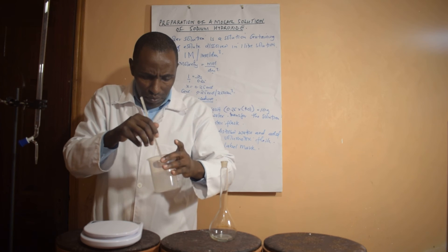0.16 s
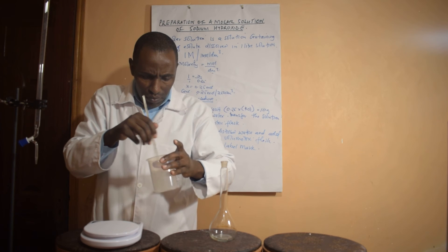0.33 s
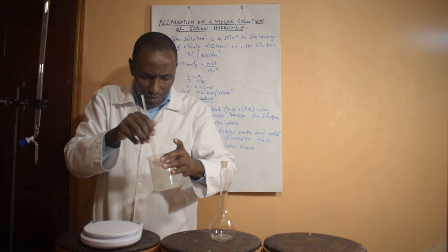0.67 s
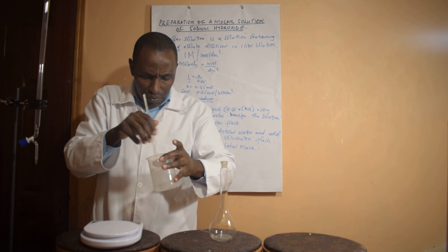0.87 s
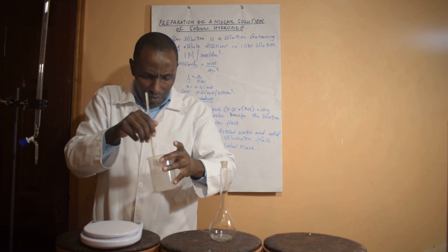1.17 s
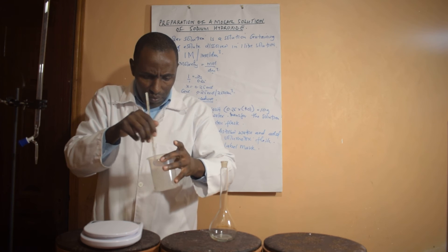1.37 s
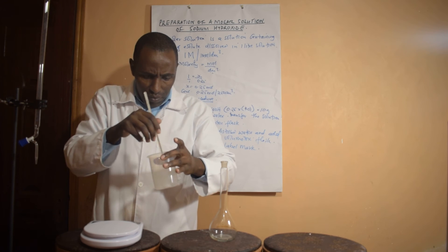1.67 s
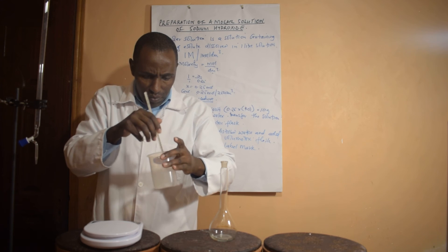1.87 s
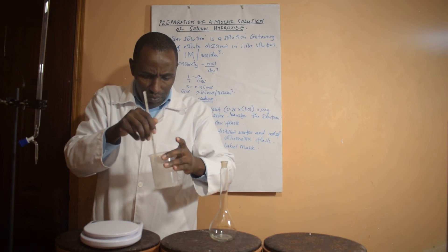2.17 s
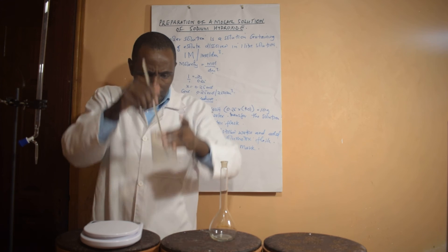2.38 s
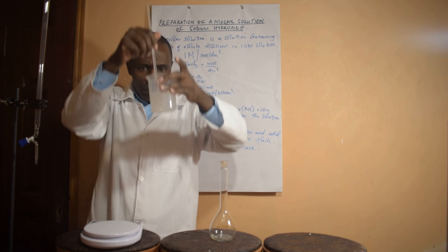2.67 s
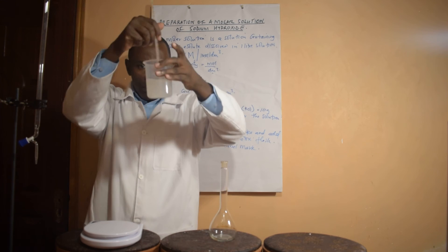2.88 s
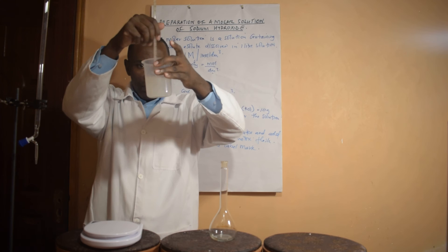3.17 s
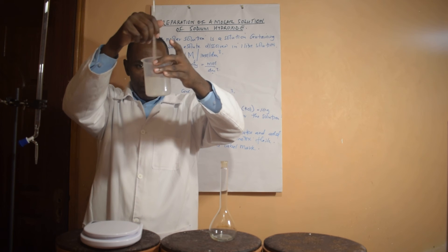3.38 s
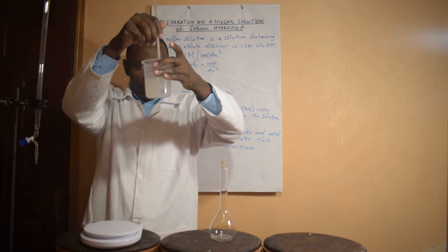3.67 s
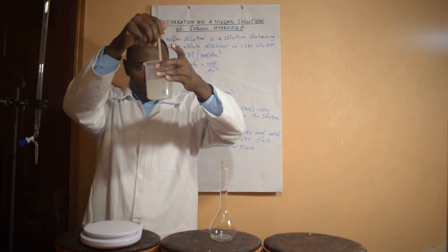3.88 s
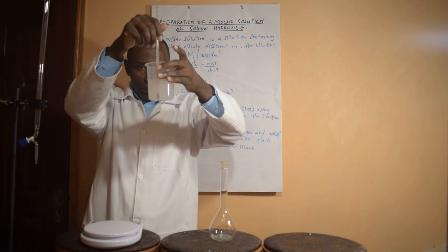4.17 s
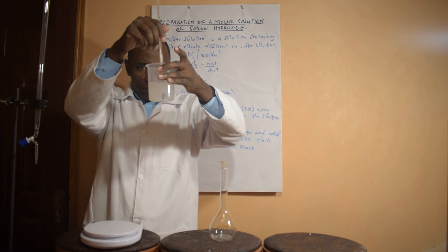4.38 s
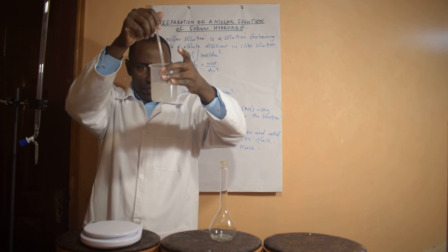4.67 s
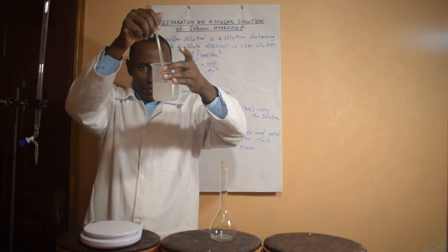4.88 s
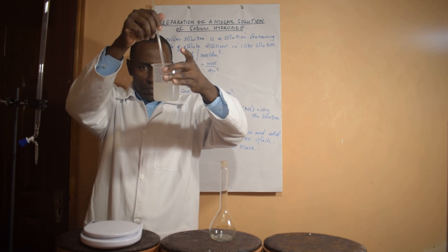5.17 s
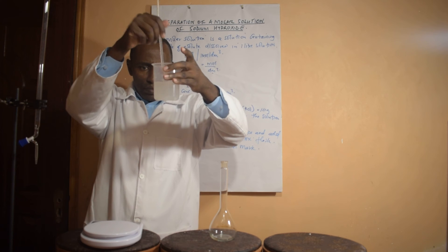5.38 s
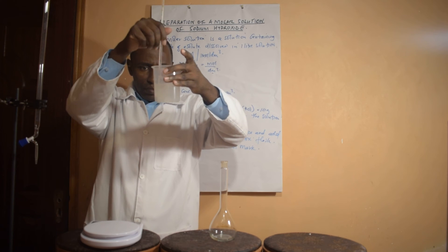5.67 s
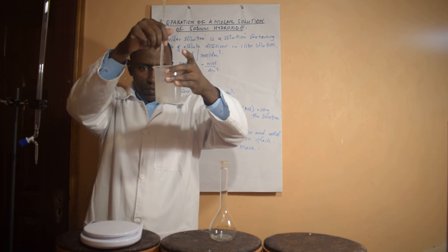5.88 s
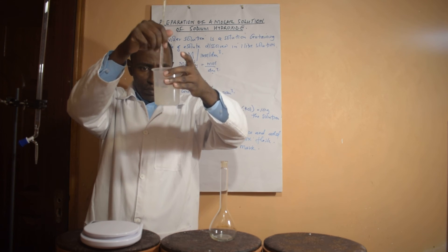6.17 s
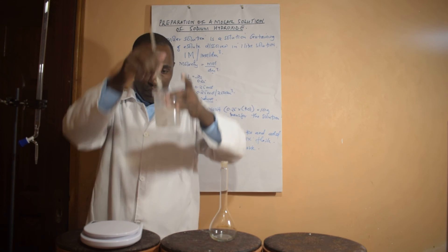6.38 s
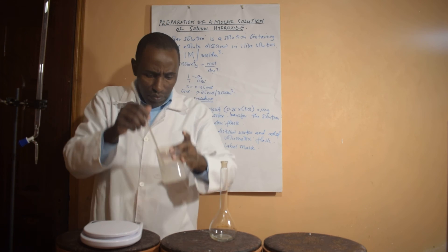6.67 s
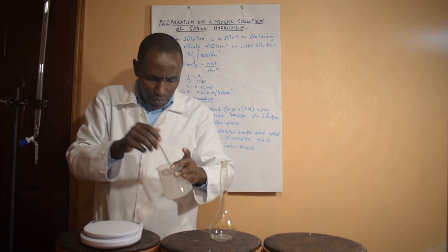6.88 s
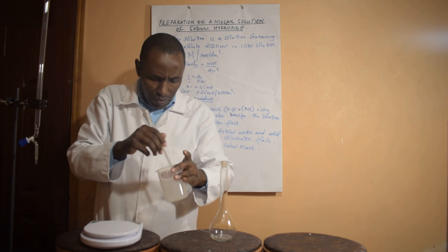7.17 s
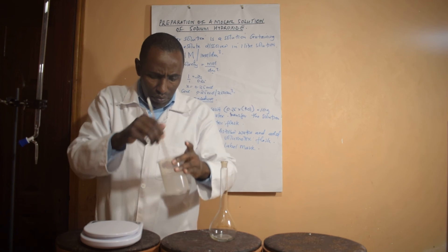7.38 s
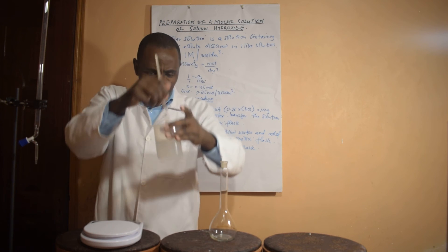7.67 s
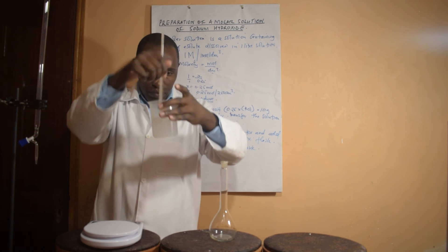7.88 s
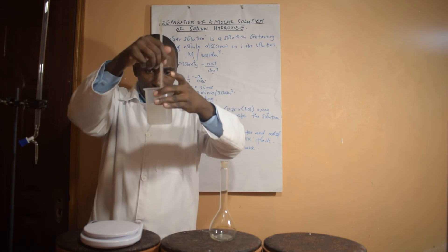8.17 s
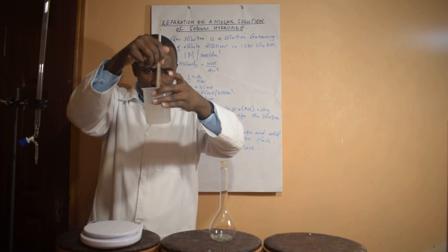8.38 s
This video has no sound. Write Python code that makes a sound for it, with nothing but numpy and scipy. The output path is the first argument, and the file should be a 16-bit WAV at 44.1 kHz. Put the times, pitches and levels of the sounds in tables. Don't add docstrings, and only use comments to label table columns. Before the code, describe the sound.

In a small quiet room, a thin rod stirs liquid in a hand-held glass beaker, heard fairly close with short early reflections. From 0 to 2.2 seconds, gritty scraping and tiny ticks run under uneven knocks, hardest around 0.4 to 1.1, then softer. From 2.2 to 3.1 it almost stops, with only faint touches. From 3.2 to 4.5 come brisk hard clinks, roughly four or five a second, each a short damped wet-glass knock with a bright crack. A lull follows until 5.4, then another cluster with strong blows near 5.8 and 6.3. After a brief gap, lighter scrapes and taps from 7 lead to a small higher gulp at 7.5 and sharp clinks from 8 to 8.5. Quiet low gulps dot the stirring. Steady hiss lies below, with a faint far engine swelling near 0.3 and revving gently around 7.

```python
import sys
import numpy as np
from scipy import signal
from scipy.fft import rfft, irfft, next_fast_len
from scipy.io import wavfile

SR = 44100
rng = np.random.default_rng(int(sys.argv[2]) if len(sys.argv) > 2 else 0)


def volts_from_decibels(level):
    exponent = np.asarray(level, float) / 20
    return 10 ** exponent


def bounce(signal):
    frames = np.transpose(np.atleast_2d(signal))
    limited = np.clip(frames, -1, 1)
    pcm = np.round(limited * 32767).astype(np.int16)
    wavfile.write(sys.argv[1], SR, pcm)


N = 376613

# t/s, knock level/dB, wall f/Hz, crack level/dB
BLOWS = [(0.4399, -19.5, 1108, -37), (0.6408, -15.5, 1170, -19), (0.8642, -28, 1080, -30),
         (.875, -14.5, 1102, -10.5), (1.091, -27, 1167, -28.5), (1.277, -26, 1090, -28),
         (1.7143, -35, 1115, -38), (2.074, -34, 993, -59), (3.263, -21, 1110, -9), (3.456, -53, 1190, -42),
         (3.4767, -21.5, 1092, -13), (3.697, -14.5, 1270, -19), (3.868, -29, 1060, -39),
         (3.917, -21, 1110, -11), (4.13, -20, 1113, -16), (4.371, -16, 1116, -27), (4.497, -29, 1100, -37),
         (4.516, -18, 1132, -9), (5.424, -37.5, 1164, -26.5), (5.791, -17.5, 1112, -30),
         (5.822, -12, 1113, -12), (6.04, -23.5, 910, -33), (6.259, -28.5, 1000, -40),
         (6.294, -16.5, 976, -24), (6.96, -35.5, 1124, -38), (7.08, -45.5, 1120, -24.5),
         (7.213, -18.5, 1135, -38.5), (7.989, -20.5, 1217, -9), (8.2353, -18, 1077, -32.5),
         (8.4621, -13.5, 1276, -9)]
# t/s, peak level/dB, loudest f/Hz
TAPS = [(0.123, -36, 5000), (0.341, -30.5, 6000), (.397, -28.5, 6900), (1.488, -31, 6240),
        (1.607, -34, 6000), (1.626, -35, 6300), (5.7085, -46, 8000), (1.6587, -32.5, 6040),
        (2.716, -39.5, 4500), (3.207, -31, 6200), (3.453, -35.5, 4770), (3.867, -31, 6100),
        (5.791, -23.5, 6240), (3.2247, -21.5, 5330), (3.5708, -24.5, 4800), (3.8837, -23.5, 8000),
        (3.8872, -41, 7040), (3.9108, -14.5, 5000), (4.486, -34, 6000), (5.03, -39, 6100),
        (5.037, -48, 6100), (5.6518, -29, 4130), (5.7745, -31.5, 5330), (6.1464, -29, 4360),
        (6.9255, -43, 4500), (7.1017, -38, 5500), (7.6102, -37.5, 6500), (7.858, -31.5, 4020),
        (7.962, -26.5, 6300), (8.2052, -29.5, 6600), (8.221, -25.5, 6100), (8.325, -31.5, 6300),
        (8.432, -29, 6540)]
# f/Hz, level/dB, time to fall 60 dB/s
SKID_MODES = [(3180, -4, 0.0041), (4250, 8.5, 0.0034), (4405, 9.5, 0.0031), (6270, 2, 0.0037),
              (7970, 4.5, 0.0024), (9770, 9, 0.0011), (5500, -6, 0.0033), (10800, -4, 0.00036),
              (13070, 8.5, 0.00051), (15500, -12, 0.0012)]


def rms_one(x):
    return x / np.sqrt(np.mean(x ** 2) + 1e-20)


def in_time(rows):
    s, *columns = np.transpose(rows)
    return [np.interp(np.arange(N) / SR, s, column) for column in columns]


def at_hz(points, hz):
    table_hz, values = np.transpose(points)
    return np.interp(np.log(np.maximum(hz, 1)), np.log(table_hz), values)


def high_pass(x, hz):
    return signal.sosfilt(signal.butter(4, hz, "high", fs=SR, output="sos"), x)


def add(out, s, sound):
    i = max(int(s * SR), 0)
    out[i:i + len(sound)] += sound[:N - i]


def ring(clicks, hz, t60):
    r = volts_from_decibels(-60 / (t60 * SR))
    w = 2 * np.pi * hz / SR
    return signal.lfilter([0, np.sin(w)], [1, -2 * r * np.cos(w), r * r], clicks + 1e-18)


def damped(hz, db, t60):
    t = np.arange(int(SR * max(t60)))[:, None] / SR
    sines = np.sin(2 * np.pi * hz * t) * volts_from_decibels(db - 60 * t / t60)
    return sines @ (-1.) ** np.arange(len(hz))


def strike(s, db, modes, spread_db, detune, skid_ms, loudest_hz=None, focus_db=0):
    out = np.zeros(N)
    hz, level_db, t60 = np.transpose(modes)
    luck = rng.standard_normal((len(s), 2, len(modes)))
    grit = rng.standard_normal((len(s), SR // 20))
    ms = np.arange(SR // 20) / SR * 1000
    for k, start in enumerate(s):
        away = 0 if loudest_hz is None else np.tanh(np.abs(np.log2(hz / loudest_hz[k])) / 0.74)
        strength_db = db[k] + level_db + spread_db * luck[k, 0] - focus_db * away
        burst = grit[k] ** 3 * np.exp(-ms / skid_ms[k]) * (1 - np.exp(-ms / (0.1 * skid_ms[k])))
        burst /= np.sqrt(np.sum(burst ** 2))
        burst[0] += 4.5 / skid_ms[k]
        body = damped(hz * (1 + detune * luck[k, 1]), strength_db, t60)
        add(out, start, signal.fftconvolve(body, burst))
    return out


def stereo_noise(size, alike):
    mid, side = rfft(rng.standard_normal((2, size)))
    c = np.clip(at_hz(alike, np.fft.rfftfreq(size, 1 / SR)), -1, 1)
    return np.sqrt((1 + c) / 2) * mid + np.sqrt((1 - c) / 2) * side * [[1], [-1]]


def hiss():
    # f/Hz, level/dB per Hz
    floor_colour = [(28, -29), (55, -2.5), (122, -3.5), (550, -7.5), (1000, -13.5), (2400, -13.5),
                    (4500, -13.5), (16000, -19)]
    # f/Hz, likeness [0..1]
    floor_alike = [(60, 0.38), (180, 0.32), (550, 0.54), (1650, 0.47), (4970, 0.46), (15000, 0.43)]
    size = next_fast_len(N)
    colour = volts_from_decibels(at_hz(floor_colour, np.fft.rfftfreq(size, 1 / SR)))
    noise = irfft(stereo_noise(size, floor_alike) * colour, size)[:, :N]
    return volts_from_decibels(-56.5) * rms_one(noise)


def rumble():
    # t/s, rise/dB, width/s
    swells = [
        (.28, 11, 0.1),
        (4.3, 2, .3),
    ]
    white = rng.standard_normal(N + SR)
    t = np.arange(N) / SR
    line = rms_one(ring(white, 59.7, 2.2)) + 2.7 * rms_one(ring(white, 78.0, 0.67))
    swell_db = sum(db * np.exp(-((t - s) / width) ** 2) for s, db, width in swells)
    late = t - 7.0
    start_hz, hz_per_s, width_s = 60.7, 3.3, 0.24
    rev = np.sin(2 * np.pi * late * (start_hz + hz_per_s * late / 2)) * np.exp(-(late / width_s) ** 2)
    return volts_from_decibels(-72 + swell_db) * rms_one(line[SR:]) + volts_from_decibels(-56) * rev


def room_response():
    # delay t/s, level/dB
    echoes = [(.0034, 3), (.0052, -12), (.0075, -6), (0.0118, -7.5), (0.0189, -2.5)]
    # f/Hz, time to fall 60 dB/s
    room_t60 = [(300, 0.22), (1100, 0.21), (3000, 0.18), (6000, 0.21), (11000, 0.13)]
    # f/Hz, likeness [0..1]
    tail_alike = [(300, .75), (1200, .87), (3100, .78), (6800, .55), (12000, .35)]
    # f/Hz, phase/radians
    left_lead = [(100, 0), (1200, .2), (3700, .5), (5800, 1.1), (8000, 1.9), (11000, 2.5), (13400, 3.3),
                 (15500, 5.5)]
    size = 2 ** 15
    t, hz = np.arange(size) / SR, np.fft.rfftfreq(size, 1 / SR)
    noise, tail = stereo_noise(size, tail_alike), 0
    for centre in 150 * 2.0 ** np.arange(8):
        octaves = np.clip(np.log2(np.maximum(hz, 1) / centre), -1, 1)
        share = np.cos(np.pi / 2 * octaves) ** 2
        tail = tail + irfft(noise * share) * volts_from_decibels(-60 * t / at_hz(room_t60, centre))
    tail_db, rise_s = -21.5, 0.002
    tail = tail * volts_from_decibels(tail_db) * (1 - np.exp(-(t / rise_s) ** 2))
    bounces = sum(volts_from_decibels(db) * np.exp(-2j * np.pi * hz * lag * rng.normal(1, 0.0411)) for lag, db in echoes)
    early = 1 + bounces / np.sqrt(1 + (hz / 6000) ** 2)
    lead = np.exp(.5j * at_hz(left_lead, hz) * [[1], [-1]] - 2j * np.pi * hz * 4 / SR)
    near_db = 2 + np.array([[.3], [-.3]])
    return irfft((early + rfft(tail)) * lead) * volts_from_decibels(near_db)


def room(x):
    places, sway_s = 5, .06
    step = np.arange(N) / (sway_s * SR)
    out = np.zeros((2, N))
    for k in range(places):
        here = np.clip(1 - np.abs((step - k + places / 2) % places - places / 2), 0, 1)
        part = (x * np.sqrt(here))[None]
        out += signal.oaconvolve(part, room_response()[:, :SR // 4], axes=1)[:, :N]
    return out


def gulps():
    # t/s, peak level/dB, f/Hz
    pockets = [(1.112, -47, 115), (3.328, -47.5, 266), (3.639, -42.5, 280), (3.766, -42.5, 276),
               (4.399, -41.5, 286), (5.513, -39, 383), (5.562, -44, 493), (5.894, -43, 276),
               (6.85, -43, 400), (6.168, -39.5, 283), (7.5, -29, 686), (7.868, -41, 265),
               (8.069, -39.5, 298)]
    out, t = np.zeros(N), np.arange(SR // 8) / SR
    for s, db, hz in pockets:
        tone = np.sin(2 * np.pi * hz * (t + 0.33 * t ** 2))
        fade = volts_from_decibels(db - 5 - 60 * t * hz / 5.9)
        add(out, s, tone * fade * (1 - np.exp(-t / 0.0018)))
    return out


def drag():
    # t/s, tip on the bottom level/dB, shaft on the wall level/dB
    pressure = [(0, -55, -53.5), (.43, -53.5, -55.5), (1.16, -53, -56.5), (2.14, -51, -58), (2.4, -60, -72),
                (3.14, -66.5, -64), (3.66, -53.5, -58.5), (4.42, -57.5, -63.5), (4.62, -71, -84),
                (5.4, -90, -69), (5.61, -71, -56.5), (6.18, -55.5, -60.5), (6.49, -54.5, -70),
                (6.97, -83, -67), (7.16, -59, -54.5), (7.37, -59, -56.5), (8.06, -54.5, -61),
                (8.54, -51, -75)]
    press_db, rub_db = in_time(pressure)
    sizes = volts_from_decibels(2.9 * np.minimum(rng.exponential(1, (2, N)), 4)) * rng.choice([-1, 1], (2, N))
    slips_per_s = np.array([[1800], [250]])
    tip, shaft = sizes * (rng.random((2, N)) < slips_per_s / SR)
    scrape = 0
    for k, (hz, db, t60) in enumerate(SKID_MODES):
        scrape = scrape + volts_from_decibels(db) * ring(tip, hz, 0.4 * t60) * (-1) ** k
    murmur = ring(shaft, 1045.5, 0.13) + ring(shaft, 1093, 0.13) + volts_from_decibels(14.5) * ring(shaft, 1246, 0.016)
    strokes_per_s, stroke_db = 30.0, 5
    strokes = rng.standard_normal(int(N / SR * 60) + 2)
    wander = np.interp(np.arange(N) / SR * strokes_per_s, np.arange(len(strokes)), strokes)
    press_db = press_db + stroke_db * wander
    return volts_from_decibels(press_db - 12.0) * rms_one(scrape) + volts_from_decibels(rub_db - 10) * rms_one(murmur)


def nicks():
    # t/s, peak level/dB
    tiny_ticks = [(0.0293, -26), (0.0812, -36), (0.1074, -34), (0.18, -35), (0.2094, -41), (0.3214, -33),
                    (0.3438, -21), (0.398, -25.5), (0.4414, -39), (0.531, -32), (0.61, -34), (0.6416, -34),
                    (0.7796, -42), (0.8126, -37), (0.8305, -36), (0.8527, -23.5), (0.8777, -19.5),
                    (0.9687, -40), (1.0952, -26), (1.1895, -38), (1.278, -27.5), (1.3643, -46),
                    (1.4326, -26), (1.488, -31), (1.5248, -32), (1.5825, -31.5), (1.604, -31.5),
                    (1.6238, -37), (1.6592, -30.5), (1.7135, -44), (1.7534, -40), (1.7729, -30.5),
                    (1.814, -26), (1.912, -41), (1.9649, -44), (1.984, -40), (2.0767, -34), (2.0951, -35.5),
                    (2.1979, -32), (2.2194, -28),
                    (7.0766, -39), (7.1006, -36), (7.1124, -28.5), (7.193, -32), (7.213, -33), (7.2788, -41),
                  (7.3053, -48), (7.3435, -46), (7.3744, -27), (7.4315, -36), (7.4858, -45), (7.5143, -45),
                  (7.5895, -41), (7.6106, -40), (7.649, -47), (7.6874, -42), (7.7078, -30)]
    s, db = np.transpose(tiny_ticks)
    return high_pass(strike(s, db - 29, SKID_MODES, 5.1, 0.022, skid_ms=np.full(len(s), 1)), 1670)


def ticks():
    # t/s, peak level/dB, loudest f/Hz
    blow_ticks = [(0.44, -31.5, 5500), (0.6423, -21.5, 4500), (0.8624, -46, 4490), (0.877, -20, 4430),
                  (1.091, -26, 4440), (1.279, -35, 4580), (1.7134, -39.5, 4570), (2.0761, -37.5, 5960),
                  (3.2654, -23, 5100), (3.478, -16, 4700), (3.697, -13.5, 4500), (3.916, -26, 4490),
                  (4.129, -18.5, 4900), (4.3734, -18.5, 5000), (4.4978, -29.5, 5110), (4.5175, -15.5, 3460),
                  (5.4268, -24.5, 5000), (5.8225, -15, 4560), (6.0435, -29.5, 4370), (6.2605, -37, 4450),
                  (6.2964, -22, 3830), (6.9596, -28, 4500), (7.0778, -59, 5950), (7.213, -30.5, 4580),
                  (7.9897, -17, 3700), (8.233, -44, 6040), (8.4634, -23, 4320)]
    # f/Hz, level/dB, time to fall 60 dB/s
    tick_modes = [(3340, 1.5, 0.0033), (3824, 6, 0.0026), (4270, 2, 0.0042), (4440, -1, 0.0084),
                  (4980, -3.5, 0.0064), (5330, 1, 0.0063), (5690, 1.5, 0.0025), (5940, 0.5, 0.0075),
                  (6300, -2, 0.0073), (6420, -1, 0.006), (6900, 0.5, 0.0024), (8230, -1.5, 0.0072),
                  (8940, 8, 0.00081), (11800, -16, 0.00039)]
    # t/s, peak level/dB
    bottom_skids = [(.0295, -38), (.0796, -35), (.1089, -31.5), (.18, -43), (.321, -37.5), (.3435, -41),
                    (.608, -33.5), (.7796, -57), (.8126, -43), (.83, -32.5), (.9687, -39.5), (1.3643, -45),
                    (1.434, -38), (1.5842, -32), (1.6227, -36), (1.78, -34), (1.8148, -30), (1.9649, -59),
                    (1.984, -30), (2.0951, -46), (2.198, -33), (2.245, -37.5), (2.4733, -44), (3.1566, -42),
                    (3.608, -37), (3.6466, -27.5), (3.889, -45), (4.0048, -33), (4.008, -27), (4.351, -46),
                    (5.9274, -38), (6.1245, -45), (7.112, -36), (7.2785, -55), (7.3726, -31.5),
                    (7.395, -39), (7.41, -43)]
    # t/s, peak level/dB
    corner_skids = [(.5313, -31), (1.1903, -30.5), (1.752, -42), (1.773, -37), (2.2194, -33.5),
                    (2.9956, -47.5), (3.1042, -35.5), (3.3051, -38), (3.9, -20), (3.914, -38), (4.312, -43),
                    (4.684, -45.5), (5.3413, -42.5), (5.563, -42.5), (7.14, -47), (7.165, -39.5),
                    (7.346, -37.5), (7.425, -39.5), (7.46, -50), (7.49, -42), (7.54, -49), (7.6106, -40),
                    (7.649, -36.5), (7.6854, -30), (7.709, -31.5), (7.735, -33)]
    # t/s, peak level/dB
    rim_skids = [(.76, -41), (1.362, -48), (1.87, -41), (2.3, -41), (3.221, -25), (3.612, -46.5),
                 (3.8363, -34), (3.903, -33), (3.9993, -30.5), (4.231, -28.5), (4.25, -40), (4.315, -57),
                 (4.35, -40), (4.478, -32), (6.143, -32.5), (6.165, -30.5), (6.185, -45), (6.262, -34),
                 (5.7078, -38.5), (7.125, -36), (7.19, -38.5), (7.435, -48), (7.52, -48), (7.882, -34),
                 (8.235, -33.5), (8.35, -40)]
    taps = [*blow_ticks, *TAPS]
    skids = []
    for rows, loudest_hz in [(bottom_skids, 6100), (corner_skids, 4830), (rim_skids, 8000)]:
        skids += [(s, db, loudest_hz) for s, db in rows]
    out = 0
    # contact in ms, then level in dB
    for rows, modes, ms, gain_db in [(taps, tick_modes, 1.48, -12.5), (skids, SKID_MODES, 9.3, -1.5)]:
        s, db, hz = np.transpose(rows)
        out = out + strike(s, db + gain_db, modes, 0.22, 0.014, np.full(len(s), ms), hz, focus_db=6.5)
    return high_pass(out, 1500)


def clacks():
    # t/s, peak level/dB, loudest f/Hz
    hard = [(0.442, -35.5, 3070), (0.6404, -20, 2480), (0.8758, -17.5, 2580), (1.0918, -24, 2320),
            (1.279, -38.5, 2850), (1.714, -39, 2880), (3.224, -29, 3300), (3.265, -18.5, 2550),
            (3.477, -15.5, 2520), (3.697, -11.5, 2600), (3.8685, -29, 3600), (3.917, -17, 2490),
            (4.1278, -13.5, 2360), (4.372, -16.5, 2390), (4.5169, -14.5, 2470), (5.4269, -23, 2640),
            (5.6516, -54, 2960), (5.7908, -30, 2470), (5.8211, -10, 3220), (6.0447, -33, 3240),
            (6.26, -30, 1990), (6.296, -21.5, 2440), (6.9596, -29, 3200), (7.2155, -33.5, 3290),
            (7.7258, -34.5, 2390), (7.8696, -32.5, 2030), (7.9919, -13, 3600), (8.2372, -31.5, 2360),
            (8.4636, -17.5, 3250)]
    # f/Hz, level/dB, time to fall 60 dB/s
    clack_modes = [(1930, -8, 0.013), (2207, -8, 0.0065), (2414, 2.5, 0.0093), (2570, 1, 0.0082),
                   (2880, -6, 0.0056), (3233, -1.5, 0.0099), (3373, -3, 0.011), (3554, -9.5, 0.017),
                   (3893, -3, 0.0067)]
    light = [(s, db - 14.5, 3300) for s, db, _ in TAPS]
    s, db, hz = np.transpose([*hard, *light])
    out = strike(s, db - 26.0, clack_modes, 1.5, 0.021, np.full(len(s), .45), hz, focus_db=6.5)
    return high_pass(out, 1360)


def cracks():
    out, ms = np.zeros(N), np.arange(SR // 30) / SR * 1000
    hits = [(s, db) for s, _, _, db in BLOWS] + [(s, db + 1.5) for s, db, _ in TAPS]
    for (s, db), grit in zip(hits, rng.standard_normal((len(hits), len(ms)))):
        snap = 16 * (ms == 0)
        add(out, s, volts_from_decibels(db - 26.5) * (grit * np.exp(-ms / 8.3) + snap))
    return signal.sosfilt(signal.butter(3, 8000, fs=SR, output="sos"), high_pass(out, 1740))


def rings():
    # t/s, peak level/dB, f/Hz, time to fall 60 dB/s
    favoured = [(.045, -30, 1090, .06), (.455, -26.5, 1100, 0.033), (.655, -32, 1130, 0.033),
                (.668, -34, 1080, 0.036), (0.891, -25, 1150, 0.033), (.905, -31, 1290, 0.037),
                (.967, -31, 1150, 0.054), (.98, -40, 1080, .08), (1.32, -43, 500, .02),
                (3.218, -31, 1370, .05), (3.266, -31, 860, 0.062), (3.306, -25, 1380, 0.12),
                (3.478, -32, 600, 0.023), (4.375, -29, 1240, 0.064), (4.385, -29, 1080, 0.044),
                (5.69, -46, 1330, .04), (5.846, -30, 1080, 0.037), (5.428, -32, 1380, .07),
                (6.045, -33, 1510, .05), (6.153, -37, 1490, .05), (7.215, -28.5, 1160, .06),
                (7.6, -44, 1210, .07), (7.738, -38, 1190, .07), (7.724, -31, 1500, 0.032),
                (7.872, -33, 1950, .03), (7.985, -37, 814, 0.056), (8.112, -30, 1550, 0.033),
                (8.466, -26, 1370, 0.052), (8.482, -28, 1300, .04)]
    out = np.zeros(N)
    for s, db, hz, t60 in favoured:
        add(out, s, damped(np.array([hz]), db - 10.5, np.array([t60])))
    return np.convolve(out, np.hanning(40) / 20)[:N]


def knocks():
    # t/s, peak level/dB, wall f/Hz
    grazes = [(.001, -35, 1130), (3.237, -39, 1310), (3.249, -31, 1105), (3.466, -30, 1164),
              (3.677, -21, 1024), (3.897, -21.5, 1090), (4.116, -36, 1300), (4.362, -34, 1150),
              (5.759, -39, 1010), (7.968, -38, 1250), (7.981, -20.5, 1105), (8.211, -27, 1130),
              (8.323, -43, 1010)]
    # t/s, peak level/dB, wall f/Hz
    nudges = [(0.033, -24, 1075), (0.228, -33, 1074), (0.338, -38, 1068), (0.393, -41, 1070),
              (0.725, -28.5, 1110), (0.955, -29.5, 1074), (1.107, -27, 1168), (1.123, -48, 1260),
              (1.319, -30.5, 1023), (1.46, -32.5, 1060), (1.528, -31.5, 994), (1.658, -31, 1002),
              (1.74, -45, 1460), (1.871, -36, 1067), (1.916, -39.5, 1170), (2.133, -32, 1086),
              (2.886, -43, 1230), (2.971, -42.5, 1216), (3.121, -41.5, 1160), (3.306, -26.5, 1220),
              (3.793, -35, 1115), (4.011, -23, 1070), (4.233, -30, 1065), (4.249, -25.5, 1005),
              (5.447, -31, 1154), (5.46, -42, 1240), (5.843, -19.5, 1115), (6.15, -31, 893),
              (7.017, -34, 1027), (7.244, -29.5, 1254), (7.329, -34, 1130), (7.591, -32, 1154),
              (7.648, -40, 1150), (7.722, -24.5, 1138), (7.869, -24.5, 1175), (8.111, -28, 1106),
              (8.247, -25, 904), (8.34, -25.5, 1115), (8.361, -47, 1270)]
    # t/s, upper mode f/Hz, upper mode level/dB, base thud level/dB
    grip = [(0, 1655, -21, -13), (.45, 1403, -10.5, -7), (.75, 1520, -10.5, -23), (1.1, 1393, -8.5, -40),
            (1.3, 1387, -10.5, -5), (2.2, 1404, -10, -3), (3.0, 1400, -6.5, -22), (3.5, 1370, -9.5, -24.5),
            (4.0, 1460, -12, -6), (4.5, 1396, -11, -21), (5.45, 1334, 2, -38), (5.83, 1386, -12, -23),
            (6.04, 1460, -10, -4), (6.3, 1465, -8.5, -7.5), (7.1, 1373, -9.5, -19), (7.98, 1304, -5, -47),
            (8.2, 1593, -22.5, -6), (8.46, 1343, -8, -41)]
    # f/Hz, level/dB, time to fall 60 dB/s
    base_modes = [(529, 4, 0.013), (600, -3, 0.024), (790, 6.5, 0.0052)]
    out = np.zeros(N)
    soft = np.hanning(24) / 12
    s, db, wall_hz = np.transpose([row[:3] for row in BLOWS] + [*grazes, *nudges])
    upper_hz, upper_db, base_db = (curve[(s * SR).astype(int)] for curve in in_time(grip))
    for k in range(len(s)):
        nudge = k >= len(s) - len(nudges)
        side_db = nudge * np.array([-7, -7, -1.5, -7, -4])
        hz = np.array([*(np.array([0.814, 0.841, 1, 1.173]) * wall_hz[k]), upper_hz[k]])
        level_db = db[k] + side_db + np.array([-22, -13, -5, -9, upper_db[k] - 0.5])
        t60 = np.array([0.015, 0.022, 0.027 * 1.33 ** nudge, 0.017, 0.045])
        add(out, s[k], damped(hz, level_db, t60))
    base = strike(s, db + base_db - 29.5, base_modes, 0.54, detune=0.0065, skid_ms=np.full(len(s), .6))
    return high_pass(np.convolve(out, soft)[:N], 792) + high_pass(base, 507)


def scene():
    hits = knocks() + clacks() + ticks() + cracks()
    beaker = hits + high_pass(drag(), 960) + gulps() + rings() + nicks()
    return room(beaker) + hiss() + rumble()


def band_limit(x):
    return signal.sosfilt(signal.butter(12, 16650, fs=SR, output="sos"), x)


def record(dry):
    cut = signal.sosfilt(signal.cheby2(14, 40, 16050, fs=SR, output="sos"), dry)
    return band_limit(cut)


dry = scene()
out = record(dry)
bounce(out)
```